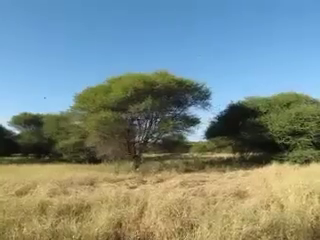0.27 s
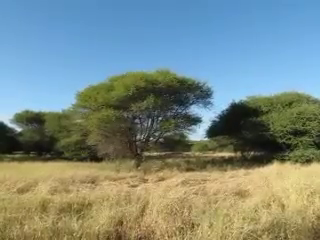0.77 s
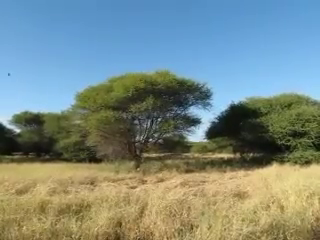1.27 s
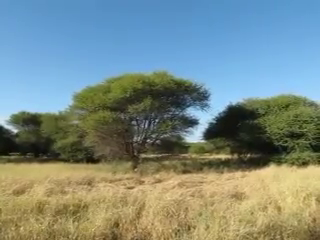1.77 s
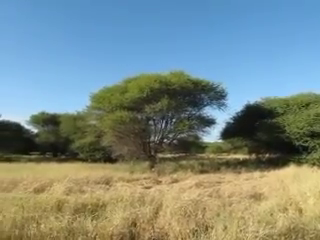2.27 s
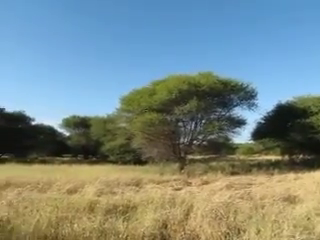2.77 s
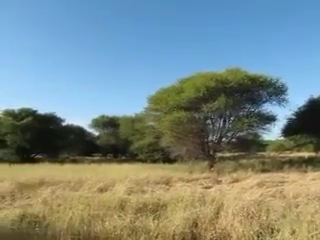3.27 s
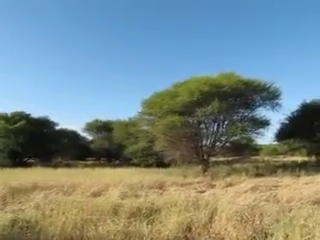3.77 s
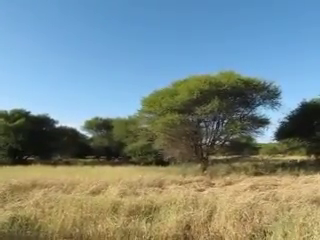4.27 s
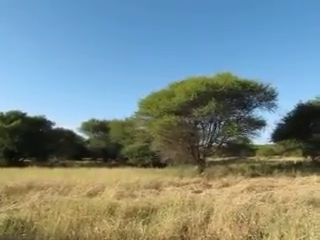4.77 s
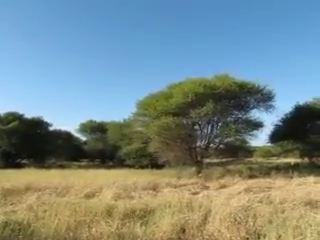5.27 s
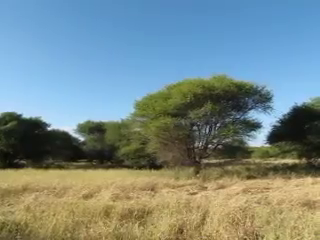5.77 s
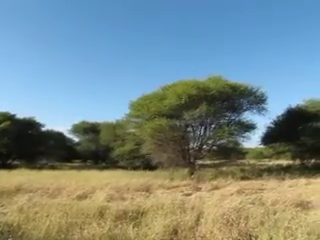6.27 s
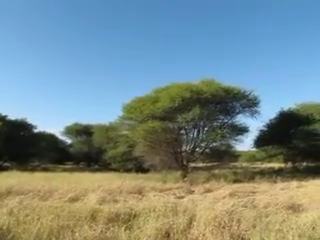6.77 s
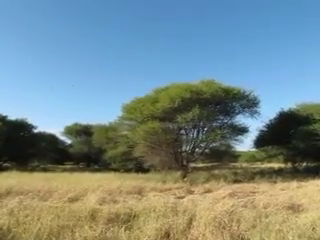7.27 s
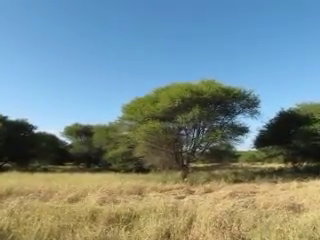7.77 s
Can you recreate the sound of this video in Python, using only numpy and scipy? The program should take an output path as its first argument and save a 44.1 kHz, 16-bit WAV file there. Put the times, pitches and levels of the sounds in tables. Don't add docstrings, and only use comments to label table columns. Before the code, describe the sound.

After a tiny silence, a vast colony of nestlings bursts in at full strength: a dense, high, sizzling hiss with short buzzy falling notes flickering inside it. It swells gently and never stops. Faint lower adult chirps appear now and then on either side with slight bush echoes. A small tap on the microphone housing comes early on the right; later, soft low wind puffs. Wide outdoor stereo, microphone among the nests.

```python
import sys
import numpy as np
from scipy import signal
from scipy.fft import rfft, irfft, next_fast_len
from scipy.io import wavfile
from scipy.ndimage import uniform_filter1d

SR = 44100
rng = np.random.default_rng(int(sys.argv[2]) if len(sys.argv) > 2 else 0)


def volts(x):
    e = np.asarray(x, float) / 20
    return 10 ** e


def persist_wave(psi):
    counts = np.round(np.clip(psi, -1, 1) * 32767).astype(np.int16)
    wavfile.write(sys.argv[1], SR, np.atleast_2d(counts).T)


N = 354211
BINS = next_fast_len(N)
HZ = np.fft.rfftfreq(BINS, 1 / SR)
TIME_S = np.arange(N) / SR

# [t/s, level/dB]
COLONY_SWELL = [(0.13, -22.5), (1.51, -21.5), (1.98, -23), (2.57, -23), (2.59, -21), (2.95, -23),
                (4.29, -22.5), (4.38, -24), (4.95, -22.5), (5.21, -24), (6.0, -23), (6.12, -24),
                (6.36, -21), (6.58, -23.5), (6.75, -22), (6.8, -23), (7.63, -23), (8.03, -24)]
# [f/Hz, density/dB per Hz]
VOICE_COLOUR = [(880, -50), (1500, -33.5), (3150, -19.5), (3800, -13.5), (4460, -5), (5600, -4.5),
                (6370, 1), (7100, -3), (8240, -13), (10600, -19.5), (11900, -25), (13000, -24),
                (14900, -23.5), (16000, -33)]
# [f/Hz, left-right likeness/1]
PORT_LIKENESS = [(30, 0.98), (300, 0.62), (600, 0.75), (1700, 0.49), (2300, 0.26), (2700, 0.089),
                 (4600, -0.047), (5300, -0.11), (6400, -0.36), (8200, -0.37), (9500, -0.0012),
                 (12000, 0.03), (13000, -0.28), (14000, 0.11)]
# [f/Hz, share/1]
RIGHT_LEAD = [(300, .03), (1000, .11), (3800, .08), (6000, 0), (9300, -.09), (11000, 0)]
# [f/Hz, left-right/dB]
PORT_LEAN = [(100, -0.5), (1000, 0), (2500, -8), (3700, -0.3), (4800, 2), (6400, -3.5), (8200, -0.6),
             (10000, -3), (12500, -1.8)]
# [f/Hz, density/dB per Hz]
AIR_COLOUR = [(12, -42), (20, -13.5), (76, -4.5), (196, -9), (352, -6), (892, -6), (1110, -3.5),
              (1510, -5.5), (2500, -11.5), (3250, -3.5), (5500, -120)]
# [t/s, length/s, start f/Hz, level/dB, left-right/dB]
ADULT_CHIRPS = [
    (.175, .035, 2630, -46, -4),
    (2.57, 0.03, 2460, -44.5, -11),
    (2.626, 0.029, 2300, -45, -14),
    (3.87, 0.028, 3300, -39.5, 13),
    (4.033, 0.058, 2950, -52, -1),
    (4.708, 0.041, 2520, -45.5, -20),
    (4.84, .035, 2700, -49, -3),
    (6.675, 0.053, 2630, -49, -23),
    (7.489, 0.079, 3780, -45, -3),
    (8.014, .03, 3200, -43, 13),
]
# [f/Hz, level/dB, t60/s]
HOUSING_RINGS = [(580, 2, 0.063), (1050, 4, .03), (794, -1, 0.035)]
# [t/s, length/s, level/dB, top f/Hz]
PORT_GUSTS = [
    [(3.38, 0.087, -52, 90), (3.45, 0.091, -60, 80), (5.84, 0.05, -41.5, 130), (5.89, 0.19, -45.5, 95),
     (6.33, 0.066, -57, 80), (7.03, 0.1, -47.5, 129), (7.15, 0.09, -41.5, 121), (7.36, 0.12, -52, 120)],
    [(3.52, 0.089, -61, 80), (6.05, 0.18, -60, 80), (6.85, .04, -52, 80), (7.08, 0.097, -47, 119),
     (7.2, 0.17, -59, 80), (7.39, 0.069, -52.5, 80)],
]


def evened(x):
    return x / np.sqrt(np.mean(x ** 2) + 1e-20)


def read(points, hz):
    f, value = np.transpose(points)
    return np.interp(np.log(hz + 1), np.log(f + 1), value)


def add(mix, s, sound):
    part = mix[..., round(s * SR):][..., :sound.shape[-1]]
    part += sound[..., :part.shape[-1]]


def drift(per_s):
    t = np.arange(N // 256 + 2) * 256 / SR
    rates = per_s * np.geomspace(.25, 1, num=24)
    slow = sum(np.sin(2 * np.pi * (f * t + rng.random())) / np.sqrt(f) for f in rates)
    return np.interp(TIME_S, t, evened(slow))


def at_ports(pair, colour):
    a, b = rfft(pair, BINS)
    same = np.clip(read(PORT_LIKENESS, HZ), -.98, .98) + 1j * read(RIGHT_LEAD, HZ)
    lean_db = read(PORT_LEAN, HZ) / 2
    left = a * volts(lean_db)
    right = (same * a + np.sqrt(1 - abs(same) ** 2) * b) * volts(-lean_db)
    ports = irfft(np.array([left, right]) * volts(read(colour, HZ)), BINS)[:, :N]
    return ports / np.sqrt(np.mean(ports.mean(0) ** 2))


def far_nests(patchy_db=.5):
    a, b, c, d, patches = rng.standard_normal((N // 128 + 5, 257, 5)).T
    patches = uniform_filter1d(patches, size=8, axis=0)
    patches = evened(uniform_filter1d(patches, size=24, axis=1))
    z = np.array([a + 1j * b, c + 1j * d]) * volts(patchy_db * patches)
    return evened(signal.istft(z, nperseg=512, noverlap=384)[1][:, :N])


def near_nests(count=7000, low_hz=2000, high_hz=14000, length_s=.04, glide_hz=700, buzz_hz=260, buzz=1.0,
               spread_db=-0.8):
    when, pitch, size, slope, flutter, near = rng.random((count, 6)).T[:, :, None]
    t = np.arange(2560) / SR
    u = np.minimum(t / (length_s * (0.395 + 0.898 * size)), 1)
    arch_hz = glide_hz * (np.sin(np.pi * u) * slope - u * (1.4 - slope))
    hz = low_hz + (high_hz - low_hz) * pitch + arch_hz
    throb = 1 + buzz * np.sin(2 * np.pi * buzz_hz * (0.592 + 0.775 * flutter) * t)
    notes = np.sin(2 * np.pi * np.cumsum(hz, axis=1) / SR) * throb * np.sin(np.pi * u ** 0.6)
    notes *= volts(-spread_db * np.log(near + 0.036))
    out = np.zeros((2, N))
    for k, s in enumerate(when[:, 0] * N / SR):
        add(out[k % 2], s, notes[k])
    return evened(out)


def colony(near_share=0.087, low_edge_hz=3500, high_edge_hz=8000):
    low_follows, over_follows = 0.16, .6
    low_drift_db, over_drift_db, drift_per_s = -0.3, .5, 5
    surge_db, surges_per_s = .35, 9
    wander_db = .25
    share = np.clip(near_share, 0, 1)
    nests = np.sqrt(1 - share) * far_nests() + np.sqrt(share) * near_nests()
    ports = at_ports(nests, VOICE_COLOUR)
    level_db = np.interp(TIME_S, *np.transpose(COLONY_SWELL)) + surge_db * drift(surges_per_s)
    swell_db = level_db - level_db.mean()
    low_db = (low_follows - 1) * swell_db + low_drift_db * drift(drift_per_s)
    over_db = (over_follows - 1) * swell_db + over_drift_db * drift(drift_per_s)
    low = signal.sosfiltfilt(signal.butter(2, low_edge_hz, fs=SR, output="sos"), ports)
    over = signal.sosfiltfilt(signal.butter(2, high_edge_hz, "high", fs=SR, output="sos"), ports)
    mix = ports - low - over + low * volts(low_db) + over * volts(over_db)
    side_db = np.outer([.5, -.5], wander_db * drift(drift_per_s))
    return mix * volts(level_db + side_db)


def air_noise(level_db=-50):
    return volts(level_db) * at_ports(rng.standard_normal((2, N)), AIR_COLOUR)


def motor_whine(whine_hz=1154, level_db=-68, waver_hz=1.55):
    waver = evened(uniform_filter1d(rng.standard_normal(N), size=8000))
    return volts(level_db) * np.sin(2 * np.pi * np.cumsum(whine_hz + waver_hz * waver) / SR)


def adults(wet_db=-8, t60_s=0.27, rest_hz=2350, sink_s=.026):
    out = np.zeros((2, N))
    for s, length, start_hz, db, pan_db in ADULT_CHIRPS:
        hz = rest_hz + (start_hz - rest_hz) * np.exp(-np.arange(0, length, 1 / SR) / sink_s)
        note = np.sin(2 * np.pi * np.cumsum(hz) / SR) * signal.windows.tukey(len(hz), .4)
        add(out, s, evened(note) * volts(db + np.array([[.5], [-.5]]) * pan_db))
    echoes = rng.standard_normal((2, 8000)) * volts(-60 * np.arange(8000) / SR / t60_s)
    echoes /= np.linalg.norm(echoes[0])
    return out + volts(wet_db) * signal.oaconvolve(out, echoes, axes=1)[:, :N]


def housing_tap(at_s=0.37, left_db=-65, right_db=-40):
    t = np.arange(3000) / SR
    ring = sum(volts(db - 60 * t / t60) * np.sin(2 * np.pi * hz * t) for hz, db, t60 in HOUSING_RINGS)
    out = np.zeros((2, N))
    add(out, at_s, ring * volts(np.array([[left_db], [right_db]])))
    return out


def wind(order=3):
    out = np.zeros((2, N))
    for port, gusts in enumerate(PORT_GUSTS):
        for s, length, db, top_hz in gusts:
            band = signal.butter(order, [0.28 * top_hz, top_hz], "band", fs=SR, output="sos")
            puff = signal.sosfilt(band, rng.standard_normal(SR // 2))
            puff = puff[-round(length * SR):]
            add(out[port], s, volts(db) * evened(puff) * signal.windows.tukey(len(puff), .5))
    return out


def scene():
    return colony() + air_noise() + motor_whine() + adults() + housing_tap() + wind()


def low_pass(x):
    return signal.sosfilt(signal.butter(12, 15830, fs=SR, output="sos"), x)


def record(dry):
    start_s = .1203
    opened = dry * np.clip((TIME_S - start_s) * 2000, 0, 1)
    return low_pass(opened)


dry = scene()
out = record(dry)
persist_wave(out)
```